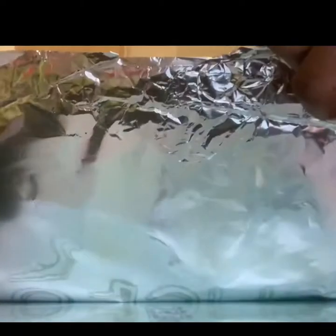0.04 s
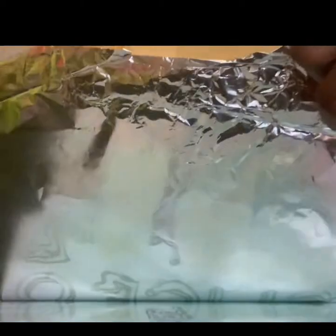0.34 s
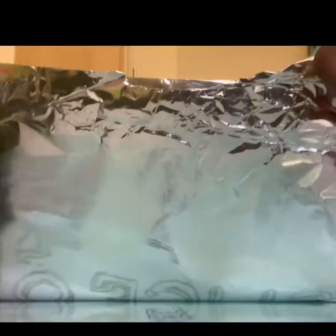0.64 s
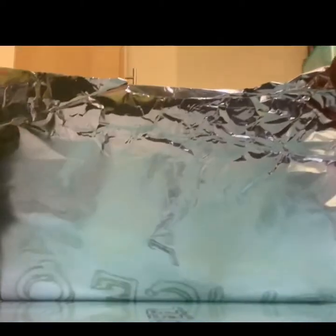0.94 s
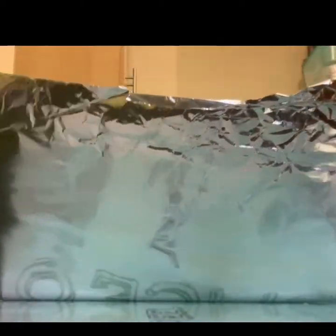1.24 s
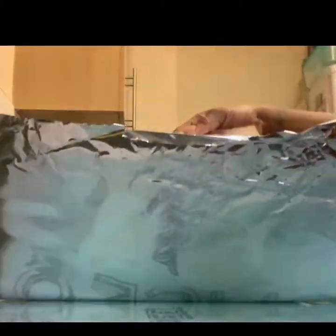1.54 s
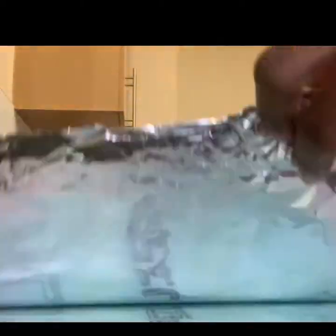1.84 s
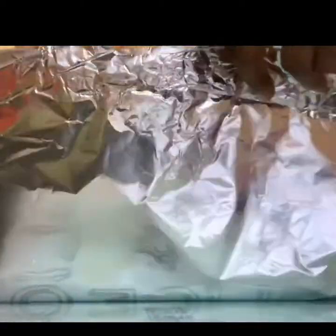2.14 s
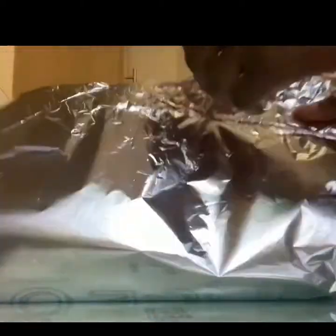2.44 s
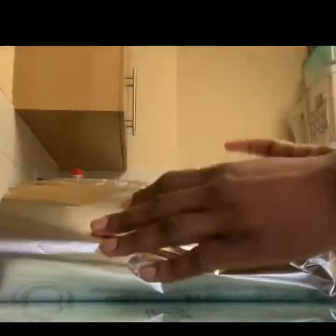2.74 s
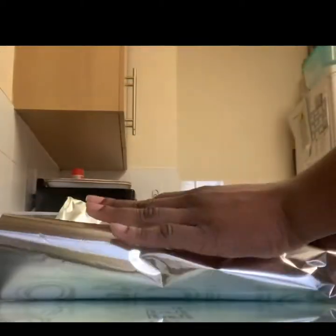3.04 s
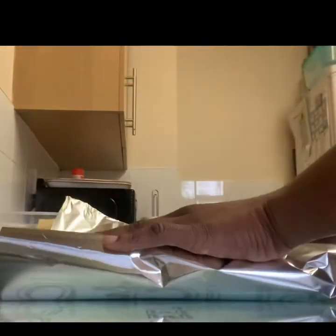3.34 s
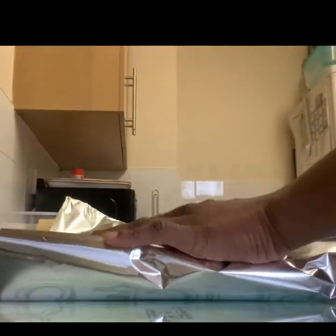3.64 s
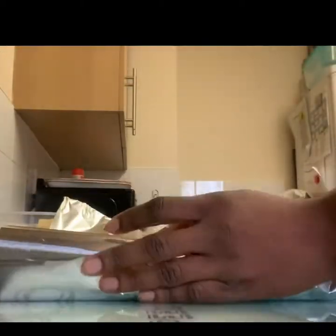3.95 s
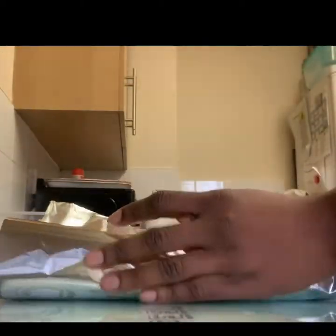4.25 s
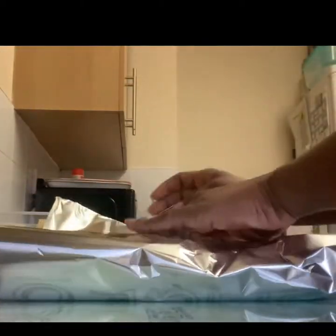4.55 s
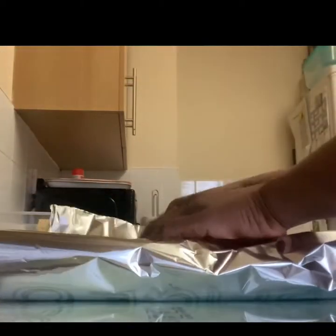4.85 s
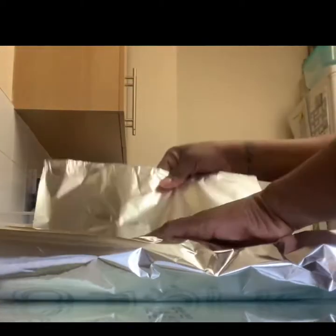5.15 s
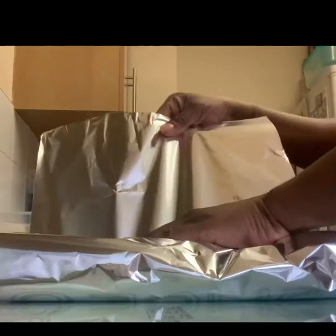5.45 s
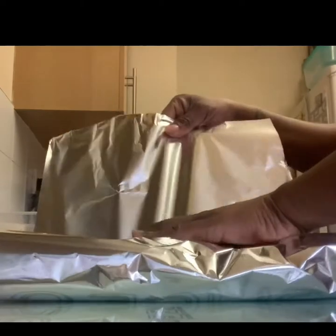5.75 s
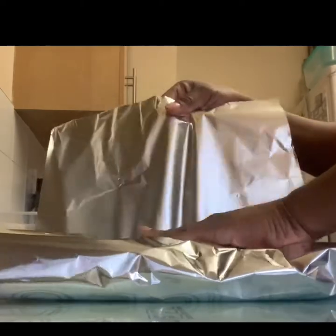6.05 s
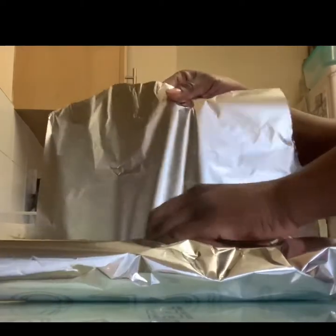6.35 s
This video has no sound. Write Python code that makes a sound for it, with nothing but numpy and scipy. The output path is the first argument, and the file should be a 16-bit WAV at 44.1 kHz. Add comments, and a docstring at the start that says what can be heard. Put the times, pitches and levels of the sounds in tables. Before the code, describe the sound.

Aluminium foil crinkles and snaps up close as hands fold and press it over a dish, with a faint refrigerator hum behind.

```python
"""Aluminium foil crinkles and snaps close to a stereo microphone as hands fold it over a dish and press it.
Creases buckle in swarms of tiny clicks, whole facets flip with louder snaps, taut ones pop with a tinny
ring, and foil rasps over foil. The dish is nudged and tapped, and the hands rumble through the counter.
Behind it a refrigerator hums in the small, hard kitchen."""
import sys
import numpy as np
from scipy import signal
from scipy.fft import rfft, irfft, next_fast_len
from scipy.io import wavfile
from scipy.ndimage import map_coordinates

SR = 44100
rng = np.random.default_rng(int(sys.argv[2]) if len(sys.argv) > 2 else 0)


def put_to_file(sound):
    """Save the sound as 16-bit audio at rate SR, in the file named by the first command-line argument."""
    columns = np.atleast_2d(sound).T  # one column per channel
    safe = np.clip(columns, -1, 1)
    whole_steps = np.round(safe * 32767)
    wavfile.write(sys.argv[1], SR, whole_steps.astype(np.int16))


N = 286209
BAND_LIMIT_HZ = 15750


# Foil spectra, sharp creases and broad sheet: (frequency [Hz], relative level [dB])
CREASE_SPECTRUM = [(200, -40), (800, -21), (1500, -8), (2300, -4), (3200, -1.5), (4300, 0), (7000, 0),
                   (9000, 4.5), (11000, 3.5), (12500, 1.2), (14200, 2.5), (15700, 1.5)]
SHEET_SPECTRUM = [(60, -8), (150, -17), (280, -6.5), (430, 0.5), (750, -0.5), (1130, 4.5), (1420, -1),
                  (2200, 5), (4000, -4.5), (8000, -56), (16000, -34)]

def crinkle(work, flex, crease_db=4.0, flex_db=-3, clump_db=0.4, crisp_from_db=-18.5):
    """Harder work buckles more creases a second; they give way in clumps and the sheet flexes along."""
    density = (unit(work) + 0.11) ** .5
    clumps = amp(clump_db * wobble(90))
    fine = facets(buckles(4200 * density, scatter_db=1.0), pitch_hz=5985, log_spread=0.94,
                  decay_cycles=36, ping_gain=0.38, flutter_t60_s=0.0086, count=12)
    broad = facets(buckles(1400 * density, scatter_db=4.5), pitch_hz=1715, log_spread=0.912,
                   decay_cycles=13.0, ping_gain=0.24, flutter_t60_s=0.016, count=8)
    creases = amp(crease_db) * work * unit(colour(fine, CREASE_SPECTRUM) * clumps / np.sqrt(density))
    sheet = amp(flex_db) * flex * unit(colour(broad, SHEET_SPECTRUM) * clumps / np.sqrt(density))
    treble_gain = (work / amp(crisp_from_db)) ** 0.24 * (work / flex) ** 0.2  # hard and stiff is crisp
    return tighten(creases, treble_gain) + sheet


def buckles(rate_hz, scatter_db):
    """Creases give way as clicks at random moments: most small, a few large."""
    sizes = amp(scatter_db * np.clip(rng.standard_normal(N), -2, 2.5))
    return (rng.random(N) < rate_hz / SR) * sizes * rng.choice([-1, 1], N)


def facets(clicks, pitch_hz, log_spread, decay_cycles, ping_gain, flutter_t60_s, count):
    """Each click shakes one facet into a diffuse flutter and a ping. Folding keeps making new facets."""
    t, block = np.arange(SR // 60) / SR, SR // 16
    out = np.zeros((2, N))
    for start in range(0, N, block):
        part = clicks[start:start + block]
        facet_clicks = part * (rng.integers(count, size=len(part)) == np.arange(count)[:, None])
        hz = np.minimum(pitch_hz * np.exp(log_spread * rng.uniform(-1, 1, (count, 1, 1))), BAND_LIMIT_HZ)
        flutter = rng.standard_normal((count, 2, len(t))) * amp(-60 * t / flutter_t60_s)
        phase = 2 * np.pi * (hz * t + rng.random((count, 2, 1)))
        ping = np.sin(phase) * np.exp(-hz * t / decay_cycles) * np.sqrt(hz)
        response = unit(flutter) + ping_gain * unit(ping)
        add(out, start / SR, signal.fftconvolve(facet_clicks[:, None], response, axes=2).sum(0))
    return unit(out)


def tighten(x, treble_gain, split_hz=7500):
    """Tight creases move power into the top octave, loose ones into the mids."""
    mids = signal.sosfiltfilt(signal.butter(2, split_hz, fs=SR, output="sos"), x)
    return (mids + treble_gain * (x - mids)) * np.sqrt(2 / (1 + treble_gain ** 2))


# Pushes and folds: (time [s], rise [s], length [s], level [dB], sheet flex re level [dB])
HAND_STROKES = [(-0.02, 0.017, 0.021, -33, -8.5), (0.199, 0.022, .19, -29, -16.5),
                (0.791, 0.028, 0.028, -23, -22), (0.832, 0.067, 0.11, -25, -13),
                (1.007, 0.044, 0.081, -28, -2), (1.094, 0.054, .075, -18.5, -8),
                (1.2, 0.026, 0.056, -21, -22), (1.435, 0.041, 0.12, -29, -11.5),
                (1.62, 0.14, 0.12, -22, -12.5), (1.831, 0.045, 0.045, -19, -15),
                (2.034, 0.0163, 0.026, -31.5, -10.5), (2.1, 0.02, 0.021, -36.5, -2.5),
                (2.255, 0.029, 0.18, -34.5, -7.5), (2.479, 0.021, 0.027, -32, -4),
                (2.581, 0.015, 0.033, -33, -2), (2.665, 0.015, 0.14, -31.5, -3.5),
                (2.875, 0.015, 0.081, -36.5, -2.5), (2.997, 0.044, 0.043, -29, -4.5),
                (3.076, 0.021, 0.21, -30.5, -5.5), (3.505, 0.045, 0.12, -33, -0.5),
                (3.807, 0.011, 0.016, -42.5, 7.5), (3.829, 0.014, 0.046, -29, -4.5),
                (4.016, 0.043, 0.057, -26.5, -7.5), (4.192, .015, 0.032, -55.5, 9),
                (4.286, 0.038, 0.17, -33, -1.5), (4.5, 0.02, 0.12, -40.5, -1),
                (4.667, 0.023, 0.14, -26.5, -6.5), (4.817, 0.018, 0.11, -26, -6),
                (4.938, 0.04, 0.12, -29, -5), (5.065, 0.031, 0.083, -27.5, -4.5),
                (5.188, 0.02, 0.13, -31.5, -3.5), (5.33, 0.014, 0.075, -33, 2),
                (5.438, 0.023, 0.12, -33.5, 0.5), (5.632, 0.023, 0.065, -32.5, -2.5),
                (5.733, 0.047, 0.09, -29, -3), (5.886, 0.038, 0.12, -29, -4.5),
                (6.004, 0.028, 0.15, -31, -3.5), (6.163, 0.067, 0.12, -28.5, -2),
                (6.328, 0.041, 0.058, -34, -1), (6.461, 0.022, 0.03, -21.5, -4)]
# Light rustle of held foil, one curve per hold: (time [s], level [dB])
GRIP_CURVES = [
    [(0.21, -49), (0.41, -40.5), (0.5, -42.5), (0.57, -36.5)],
    [(0.8, -39), (1.018, -32.5), (1.4, -32.5)],
    [(1.43, -33.5), (1.644, -33), (1.78, -50.5), (1.95, -34.5), (2.15, -37.5)],
    [(2.2, -39), (3.206, -43), (3.4, -43)],
    [(3.53, -46), (3.72, -39.5), (3.8, -49.5), (3.93, -41.5), (4.26, -49)],
    [(4.32, -52), (4.5, -35), (4.55, -45), (4.585, -35), (4.61, -46)],
    [(4.685, -34), (4.826, -31), (5.55, -35.5), (5.61, -36.5), (5.8, -41.5), (5.895, -36), (5.97, -35.5),
     (6.49, -33)],
]

def hand_effort(crease_fall_db_per_s=269, sheet_fall_db_per_s=159, grip_work_db=-1, grip_flex_db=-12):
    """Envelopes of crease work and sheet flex: the strongest stroke leads, on top of the grip."""
    work, flex, grip = np.zeros((3, N))
    for s, rise_s, length_s, db, flex_db in HAND_STROKES:
        work = np.maximum(work, amp(db) * stroke(s, rise_s, length_s, crease_fall_db_per_s))
        flex = np.maximum(flex, amp(db + flex_db) * stroke(s, rise_s, length_s, sheet_fall_db_per_s))
    for hold in GRIP_CURVES:
        start_s, end_s = hold[0][0], hold[-1][0]
        grip += amp(curve(hold)) * stroke(start_s, 0.019, end_s - start_s, crease_fall_db_per_s)
    return np.hypot(work, amp(grip_work_db) * grip), np.hypot(flex, amp(grip_flex_db) * grip)


def stroke(start_s, rise_s, length_s, fall_db_per_s):
    """Pressure builds, holds to the end of the stroke, then lets go."""
    t = np.arange(N) / SR - start_s
    return np.clip(t / rise_s, 0, 1) * amp(-fall_db_per_s * np.maximum(t - length_s, 0))


# Facet flips: (time [s], level [dB], relative flap [dB], run t60 [s], relative crack [dB])
FACET_SNAPS = [(0.0578, -33, -6, 0.14, -2), (0.172, -39, -8, 0.11, 6), (0.213, -36, -19, 0.08, -6),
               (0.541, -32, -39, 0.097, 17.5), (0.612, -26, -11.5, 0.17, 3), (0.691, -32, -7, 0.084, 9.5),
               (0.7721, -27, -23, 0.087, 10), (0.8085, -28, -21, 0.054, 5), (0.928, -24, -22, 0.049, -1),
               (1.073, -18.5, -28, 0.16, -7), (1.156, -23, -9, 0.08, 0), (1.2305, -23, 1, 0.13, 0),
               (1.24, -27, -19, 0.04, 0), (1.391, -41, -13, 0.03, 5), (1.4225, -23.5, -13.5, 0.14, 9),
               (1.468, -27, -12, 0.037, 9), (1.63, -23.5, -13.5, 0.43, 0), (1.711, -21.5, -21, 0.13, -2),
               (1.721, -20, -25, 0.11, -3), (1.749, -20.5, -23, 0.049, 6), (1.797, -19.5, -23, 0.16, 5),
               (1.8343, -20, -11, 0.15, 7), (2.05, -26, -24, 0.18, 0), (2.1823, -13.5, -6.5, 0.1, -1),
               (2.194, -15, -13, 0.11, -6), (2.2639, -22, -3.5, 0.09, 2), (2.346, -25.5, -7, 0.054, 0),
               (2.497, -28, -12, 0.073, -10), (2.604, -22.5, -8, 0.21, 6.5), (2.687, -24, -13, 0.069, -6),
               (2.75, -29, -10, 0.072, -1), (2.8265, -25.5, -4, 0.035, 3), (2.8887, -30, -0.5, 0.076, -2),
               (3.004, -25, -12, 0.071, 1), (3.034, -31, -16, 0.05, -2), (3.099, -36.5, 8, 0.093, -1),
               (3.371, -37.5, 0.5, 0.039, 11), (3.401, -42, -5, 0.037, 4),
               (3.4627, -33.5, -1.5, 0.054, 9.5), (3.52, -33, -1, 0.11, 8), (3.607, -20, -23, 0.052, 1),
               (3.651, -32, -10, 0.03, 4), (3.664, -44, -14, 0.037, 3), (3.6795, -24.5, -8, 0.051, 9),
               (3.8239, -29, -1, 0.04, 8.5), (3.926, -34, -18, 0.036, 1), (3.974, -35, -1, 0.02, 6),
               (3.999, -33.5, 1, 0.1, 6.5), (4.05, -30, -6, 0.046, -1), (4.129, -32, -1, 0.035, 5),
               (4.169, -30.5, -1.5, 0.093, 4), (4.2203, -34.5, -11, 0.043, -3),
               (4.254, -38, -10, 0.031, -3), (4.3161, -23, -7.5, 0.11, 9), (4.318, -36, -1, 0.019, 12.5),
               (4.345, -24, -17, 0.04, 7), (4.59, -26.5, -6, 0.069, 0), (4.661, -26.5, -4.5, 0.073, 7),
               (4.713, -23.5, -2, 0.062, 5), (4.764, -21, -13, 0.11, -2), (4.865, -20.5, -13, 0.099, -2),
               (5.015, -27, -4, 0.096, 0), (5.108, -23.5, -14, 0.19, -5), (5.182, -24.5, -5.5, 0.18, 5),
               (5.278, -21.5, -18, 0.11, -1), (5.365, -23, -11, 0.075, 0), (5.649, -27, -5, 0.069, -2),
               (5.662, -31, -14, 0.13, -2), (5.741, -25, -4.5, 0.077, 6), (5.8084, -27, -26, 0.048, 6),
               (5.872, -28, -18, 0.037, 10), (5.925, -28.5, 2, 0.13, 7), (5.969, -26, -5, 0.15, -6),
               (6.0, -25, -15, 0.05, 8), (6.24, -27, 1, 0.12, 2), (6.372, -25, 0, 0.042, -1),
               (6.405, -24.5, -8.5, 0.17, 6), (6.455, -26.5, -2, 0.044, 4), (6.476, -22, -2, 0.09, -4)]

def snaps(run_db=4.5, click_db=5.0, crack_t60_s=0.0073, flap_db=-1, crisp_from_db=-22):
    """A facet flips with a click and a brittle crack, sets off a run of crackle and flaps the sheet."""
    t = np.arange(SR // 3) / SR
    cracks, flaps = np.zeros((2, 2, N))
    force = np.zeros(N)
    for s, db, low_db, t60_s, crack_db in FACET_SNAPS:
        run = amp(run_db - 60 * t / t60_s) * (1 - np.exp(-t / (0.021 * t60_s)))  # long runs build slower
        burst = amp(db) * np.hypot(run, amp(crack_db - 60 * t / crack_t60_s))
        add(force, s, burst)
        add(cracks, s, burst * rng.standard_normal((2, len(t))))
        add(cracks, s, amp(db + crack_db + click_db) * np.array([[1], [0]]))  # click, shared part only
        add(flaps, s, amp(flap_db + low_db - run_db) * burst * rng.standard_normal((2, len(t))))
    treble_gain = (force / amp(crisp_from_db)) ** 0.4  # harder is brighter
    return tighten(colour(cracks, CREASE_SPECTRUM), treble_gain) + colour(flaps, SHEET_SPECTRUM)


# Taut facets popping through: (time [s], pitch [Hz], level [dB])
FACET_POPS = [(0.539, 2290, -26), (0.909, 2430, -21.5), (1.49, 1930, -25.5), (2.092, 1120, -32.5),
              (2.1807, 1650, -23.5), (2.189, 2660, -17), (3.465, 2900, -33), (3.68, 2450, -26),
              (3.824, 2070, -25), (4.3138, 2460, -21), (5.009, 2370, -20), (5.512, 1640, -24.5),
              (5.552, 1740, -25.5), (5.677, 2480, -21.5), (5.778, 1040, -30), (5.808, 4570, -15.5),
              (5.828, 2110, -25), (6.242, 1650, -26), (6.373, 1150, -31)]

def pops(ring_db=1, rise_s=0.00018, decay_cycles=6.5, drift_rad=0.04, tick_db=-7, tick_t60_s=0.017):
    """A taut facet gives way with a dry tick and rings a few rough cycles at a pitch set by its size."""
    t = np.arange(SR // 20) / SR
    rings, ticks = np.zeros((2, 2, N))
    for s, hz, db in FACET_POPS:
        drift = drift_rad * np.cumsum(rng.standard_normal((2, len(t))), axis=1)
        ring = np.sin(2 * np.pi * (hz * t + rng.random((2, 1))) + drift) * np.exp(-hz * t / decay_cycles)
        add(rings, s, amp(db + ring_db) * ring * (1 - np.exp(-t / rise_s)))
        add(ticks, s, amp(db + tick_db - 60 * t / tick_t60_s) * rng.standard_normal((2, len(t))))
    return rings + colour(ticks, SHEET_SPECTRUM)


# Foil-on-foil drags: (time [s], rise [s], length [s], level [dB])
FOIL_DRAGS = [(1.658, 0.04, 0.1, -30.5), (1.835, 0.018, 0.041, -30.5), (4.764, 0.02, 0.05, -40),
              (4.827, 0.023, 0.036, -30)]
# Their rasp: (frequency [Hz], relative level [dB])
RASP_SPECTRUM = [(500, -36), (2200, -2), (3500, -2), (5800, -6), (7500, -8), (15000, -26)]

def scrapes(fall_db_per_s=450):
    """Foil dragged over foil catches and slips in a dense, biting rasp."""
    drag = sum(amp(db) * stroke(s, rise_s, length_s, fall_db_per_s)
               for s, rise_s, length_s, db in FOIL_DRAGS)
    slips = facets(buckles(2500, scatter_db=8.0), pitch_hz=4700, log_spread=0.396,
                   decay_cycles=7.3, ping_gain=1.0, flutter_t60_s=0.004, count=16)
    return drag * unit(colour(slips, RASP_SPECTRUM))


# Top treble of the foil: (time [s], gain [dB])
SHEEN_CURVE = [(0, -6), (0.6, -4), (0.7, -3), (1.0, -1), (2.05, 0), (2.2, 2.5), (2.4, 3.5), (2.5, 2),
               (3.6, -0.5), (4.0, 1.5), (4.4, -4), (4.7, 0.5), (5.2, 3.5), (5.45, 2), (5.8, 1.5),
               (6.49, -1.5)]

def sheen(x, split_hz=12000):
    """The highest treble swells and dulls."""
    treble = signal.sosfiltfilt(signal.butter(4, split_hz, "high", fs=SR, output="sos"), x)
    return x + (amp(curve(SHEEN_CURVE)) - 1) * treble


# Dish nudged against the counter: (time [s], level [dB], relative rocking [dB])
DISH_NUDGES = [(1.155, -50, 2), (1.236, -49, 12), (1.455, -59, 11), (2.185, -38, 1), (2.197, -25.5, -6.5),
               (2.266, -33, -15), (3.157, -35, -25), (4.444, -34.5, -23), (4.96, -56, 11), (5.128, -56, 16),
               (5.96, -36, -12), (6.471, -33, -15)]
# Fingertips on the covered dish: (time [s], level [dB])
FINGER_TAPS = [(2.181, -28), (2.296, -46), (2.5297, -36), (3.565, -30), (3.681, -34.5), (3.8227, -33),
               (4.3147, -21), (4.3455, -37)]
# Dish modes: (frequency [Hz], level [dB], t60 [s])
BASE_MODES = [(302, 10, 0.024), (402.5, 8, 0.06), (480, 8, 0.016)]
ROCKING_MODES = [(64, 10.5, 0.11), (146.3, 6, 0.16), (213, 10.5, 0.059)]
RIM_MODES = [(1116, 6, 0.031), (2070, -22, .02)]

def dish():
    """A nudge knocks the base and rocks the dish; a fingertip rings its rim."""
    base_blows = [(s, db) for s, db, _ in DISH_NUDGES]
    rocking_blows = [(s, db + rock_db) for s, db, rock_db in DISH_NUDGES]
    base = knocks(base_blows, BASE_MODES, gain_db=-6, attack_s=0.00096)
    rocking = knocks(rocking_blows, ROCKING_MODES, gain_db=-7, attack_s=0.0015)
    rim = knocks(FINGER_TAPS, RIM_MODES, gain_db=-2, attack_s=0.00097)
    return base + rocking + rim


def knocks(blows, modes, gain_db, attack_s):
    """Soft blows ring a set of modes, at slightly new strengths each time."""
    t, out = np.arange(SR // 3) / SR, np.zeros(N)
    for s, db in blows:
        ring = sum(amp(mode_db + rng.normal(0, 1.2) - 60 * t / t60_s) * np.sin(2 * np.pi * hz * t)
                   for hz, mode_db, t60_s in modes)
        add(out, s, amp(db + gain_db) * ring * (1 - np.exp(-t / attack_s)))
    return np.array([out, out])


def hand_rumble(flex, gain_db=-15):
    """The moving hands rumble softly through the counter."""
    spectrum_hz_db = [(20, -44), (50, -17.0), (90, 3.5), (200, -8.0), (350, -14.0), (1500, -74)]
    return amp(gain_db) * flex * colour(rng.standard_normal((2, N)), spectrum_hz_db)


# Mains and compressor lines: (frequency [Hz], level [dB])
HUM_LINES = [(99.9, -50.5), (107.8, -56.5), (137, -66.5), (143.8, -68.5)]
# Wavering of the hum: (time [s], gain [dB])
HUM_CURVE = [(0, -1), (0.6, -0.5), (0.72, 3), (1.05, 3.5), (1.35, -2.5), (1.97, -4), (2.4, -6), (2.58, 3),
             (2.8, -1.5), (3.4, 0), (3.8, 1), (4.25, -1.5), (4.9, 4.5), (5.3, -4), (5.8, 1), (6.49, 3)]
# Low rush: (frequency [Hz], relative level [dB])
RUSH_SPECTRUM = [(20, -16), (32, -16), (50, -3), (90, -7), (150, -2.5), (250, -11), (600, -10.5),
                 (1000, -18), (1500, -18.5), (5000, -19), (16000, -68)]

def refrigerator(rush_db=-52, hum_gain_db=0.5, waver_rad=0.42):
    """Mains and compressor lines beat against each other over a low rush."""
    t, hum = np.arange(N) / SR, np.zeros(N)
    for hz, db in HUM_LINES:
        phase = 2 * np.pi * (hz * t + rng.random()) + waver_rad * wobble(2.13)
        hum += amp(db) * np.sqrt(2) * np.sin(phase)
    rush = colour(rng.standard_normal((2, N)), RUSH_SPECTRUM)
    return amp(hum_gain_db + curve(HUM_CURVE)) * hum + amp(rush_db) * rush


# Room decay: (frequency [Hz], t60 [s])
KITCHEN_DECAY = [(200, 0.15), (1500, 0.67), (6000, 0.46), (15000, 0.24)]

def kitchen(x, wet_db=-10.5, onset_s=0.00046):
    """Counter, tiles and cupboards answer with a short, bright tail that varies as hands and foil move."""
    wet, block = np.zeros((2, N)), SR // 4
    for start in range(0, N, block):
        hz, t, noise = signal.stft(rng.standard_normal((2, SR // 2)), SR, nperseg=256)
        envelope = amp(-60 * t / along(KITCHEN_DECAY, hz)[:, None]) * (1 - np.exp(-t / onset_s))
        _, tail = signal.istft(noise * envelope, SR, nperseg=256)
        tail /= np.linalg.norm(tail[0])
        add(wet, start / SR, signal.fftconvolve(x[:, start:start + block], tail, axes=1))
    return x + amp(wet_db) * wet


# Likeness of left and right: (frequency [Hz], coherence [0-1])
STEREO_COHERENCE = [(150, .97), (450, .72), (900, .3), (2500, .25), (5500, .15), (6800, .55), (7700, 1),
                    (9000, 1), (10300, .93), (15000, .93)]
# Stereo balance: (frequency [Hz], left minus right [dB])
STEREO_BALANCE = [(35, 1), (100, 3.5), (200, 2), (280, -0.5), (400, 0.5), (550, 4.5), (1100, 1.7),
                  (2000, 2.6), (4500, 1), (7500, 0)]
# Stereo phase of the treble: (frequency [Hz], right lead [deg])
STEREO_PHASE = [(4200, 0), (6500, 95), (7700, 176), (9000, 184), (10300, 268), (11700, 356), (13100, 364),
                (14400, 445), (15700, 535)]

def stereo_image(x):
    """A shared and an unshared part become left and right; their treble phase turns with frequency."""
    size = next_fast_len(N + SR // 10)
    hz = np.fft.rfftfreq(size, 1 / SR)
    shared, unshared = rfft(x, size)
    coherence = np.clip(along(STEREO_COHERENCE, hz), 0, 1)
    mid = shared * np.sqrt((1 + coherence) / 2)
    side = unshared * np.sqrt((1 - coherence) / 2)
    lean = amp(along(STEREO_BALANCE, hz) / 2) * np.exp(-1j * np.radians(along(STEREO_PHASE, hz)) / 2)
    return irfft(np.array([(mid + side) * lean, (mid - side) / lean]), size)[:, :N]


def amp(db):
    """Decibels to gain."""
    return 10 ** (np.asarray(db) / 20)


def unit(x):
    """Scale to rms 1."""
    return x / np.sqrt(np.mean(x ** 2) + 1e-20)


def along(points, hz):
    """(frequency [Hz], value) points read on a log axis."""
    knots_hz, values = np.transpose(points)
    return np.interp(np.log(hz + 1), np.log(knots_hz + 1), values)


def curve(rows):
    """(time [s], value) rows as one value per sample."""
    return np.interp(np.arange(N) / SR, *np.transpose(rows))


def wobble(rate_hz):
    """Random knots joined by straight lines."""
    knots = rng.standard_normal(int(N * rate_hz / SR) + 4)
    return map_coordinates(knots, [np.arange(N) * rate_hz / SR], order=1)


def add(track, time_s, sound):
    """Mix a sound into a track."""
    start = max(round(time_s * SR), 0)
    part = track[..., start:start + sound.shape[-1]]
    part += sound[..., :part.shape[-1]]


def colour(x, spectrum):
    """Minimum-phase filter with the given spectrum; keeps the power of white noise."""
    size = 2 ** 12
    gain = unit(amp(along(spectrum, np.fft.rfftfreq(size, 1 / SR))))
    cepstrum = irfft(np.log(gain))
    cepstrum[1:size // 2] *= 2
    cepstrum[size // 2 + 1:] = 0
    response = irfft(np.exp(rfft(cepstrum)))
    return signal.fftconvolve(x, response[None], axes=1)[:, :N]


def scene():
    """Foil and dish in the kitchen, over the hum."""
    work, flex = hand_effort()
    foil = sheen(crinkle(work, flex) + snaps() + pops() + scrapes())
    return stereo_image(kitchen(foil + dish()) + hand_rumble(flex) + refrigerator())


def record(dry):
    """Brick-wall low-pass at the band limit."""
    size = next_fast_len(N + SR // 10)
    passband = np.fft.rfftfreq(size, 1 / SR) < BAND_LIMIT_HZ
    return irfft(rfft(dry, size) * passband, size)[:, :N]


dry = scene()
out = record(dry)
put_to_file(out)
```